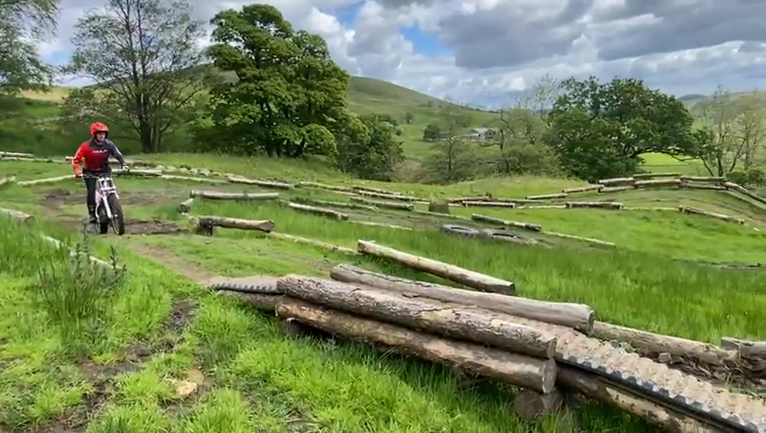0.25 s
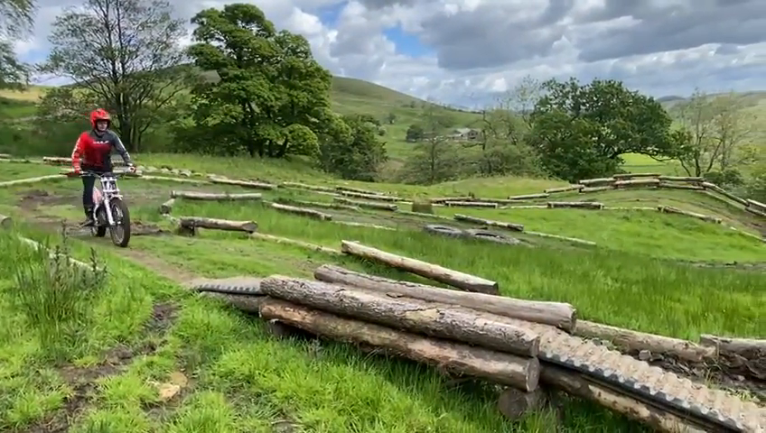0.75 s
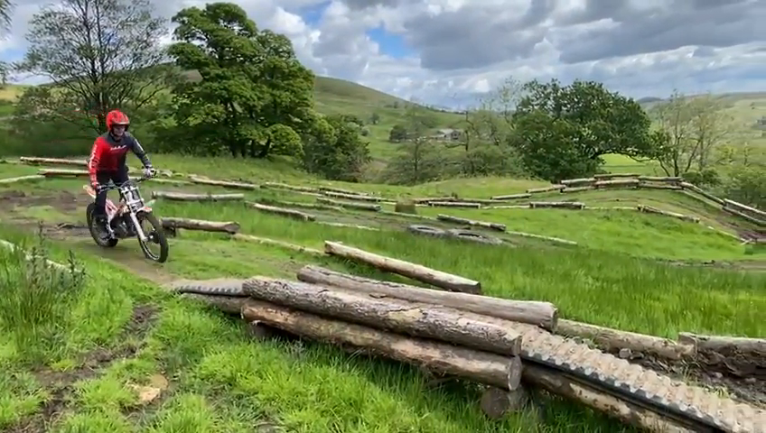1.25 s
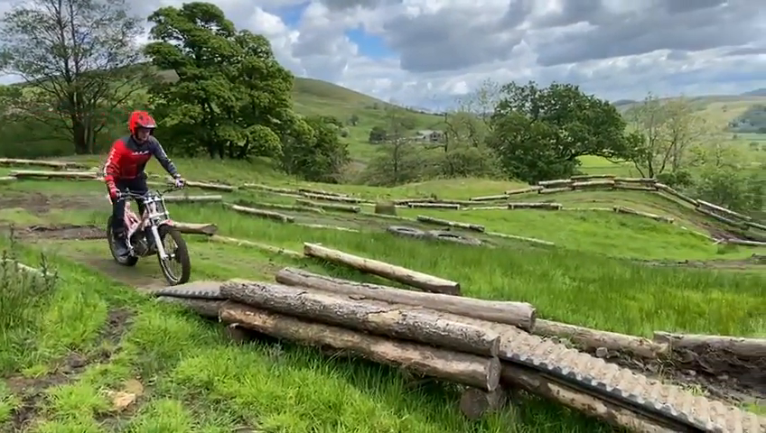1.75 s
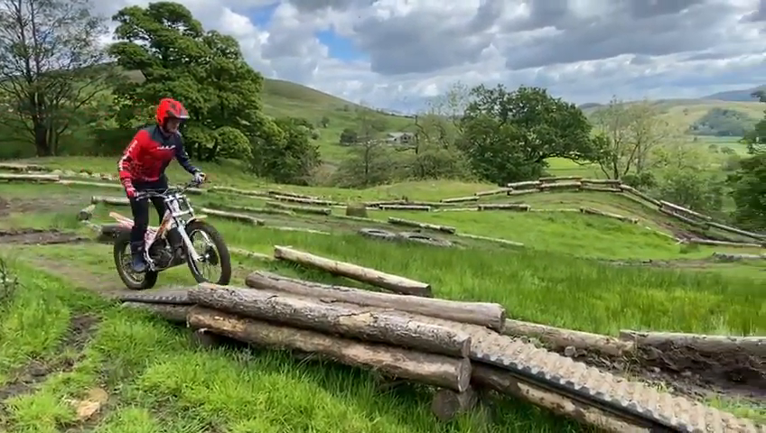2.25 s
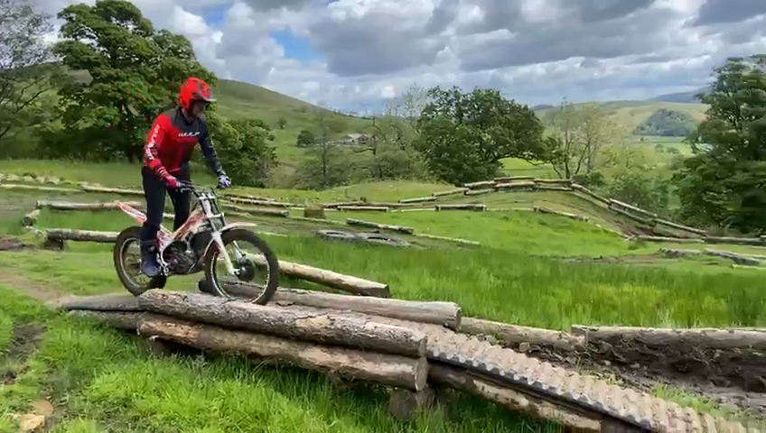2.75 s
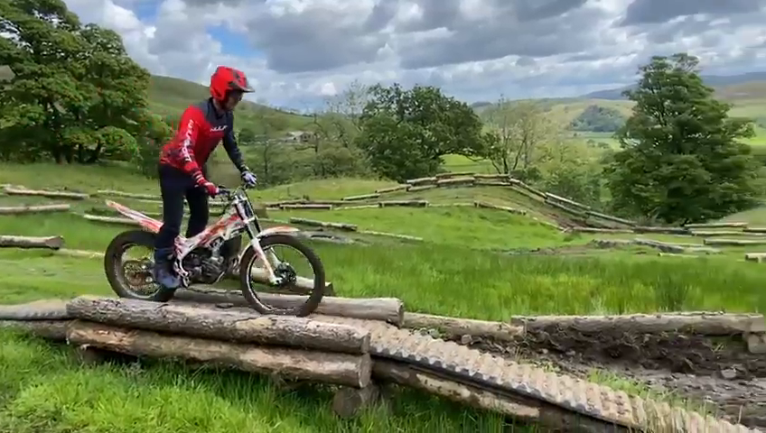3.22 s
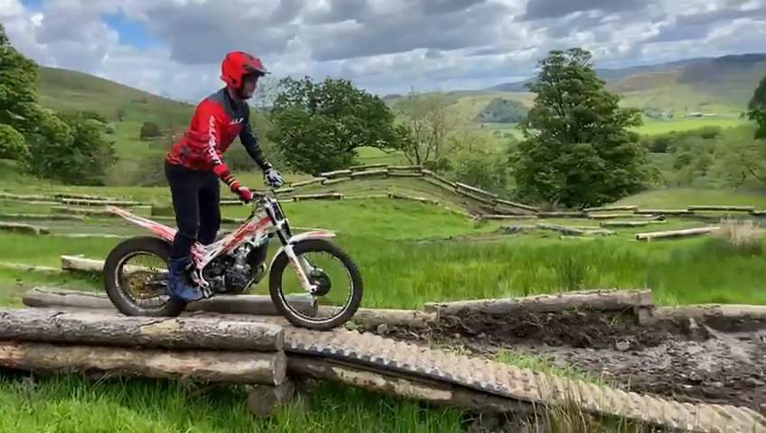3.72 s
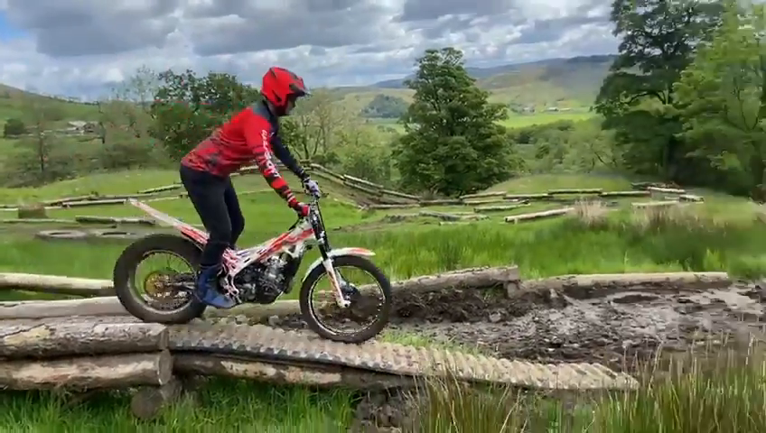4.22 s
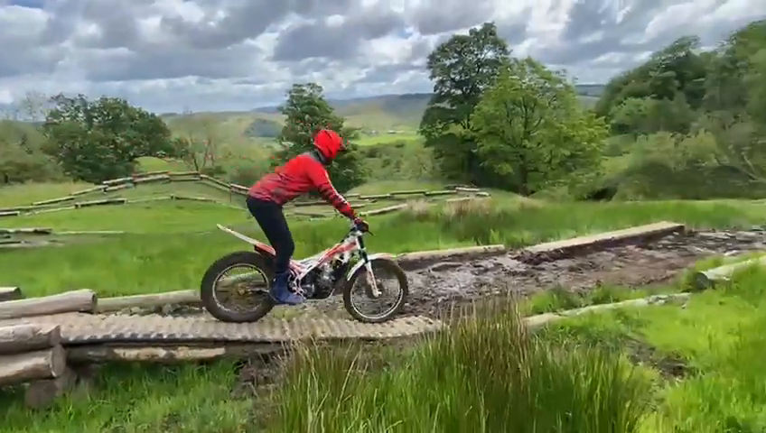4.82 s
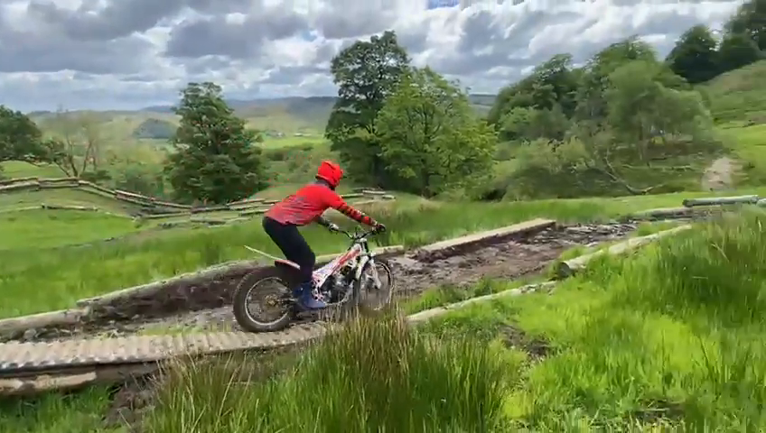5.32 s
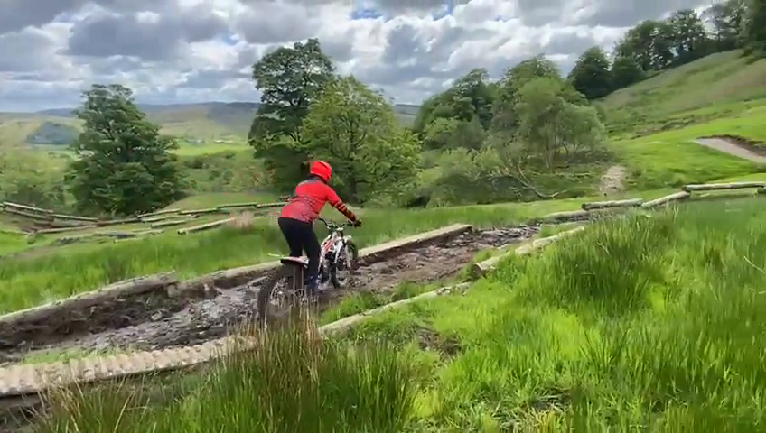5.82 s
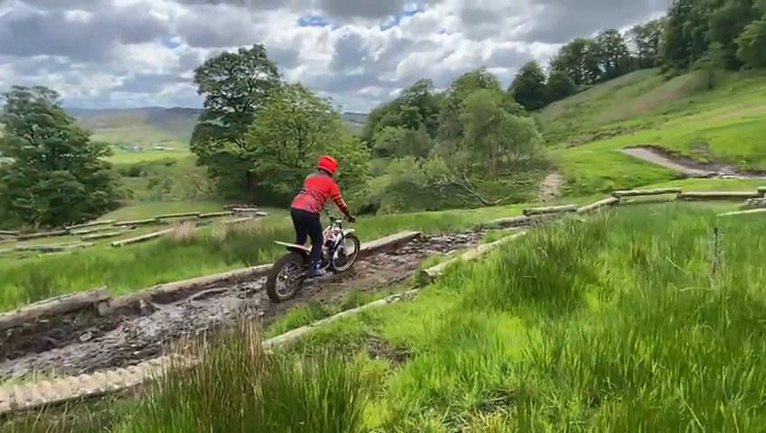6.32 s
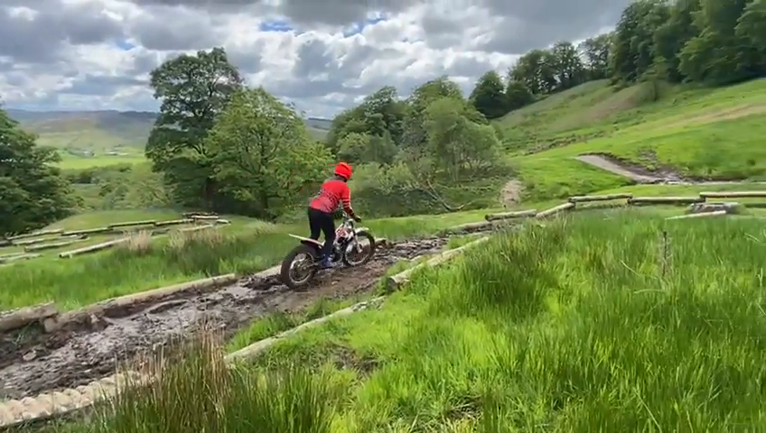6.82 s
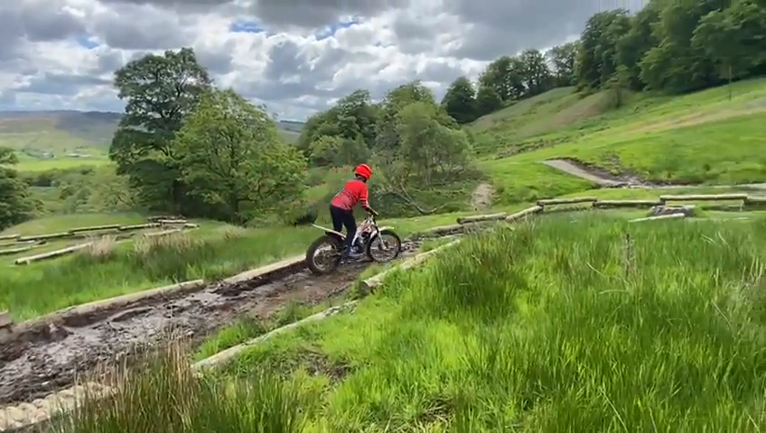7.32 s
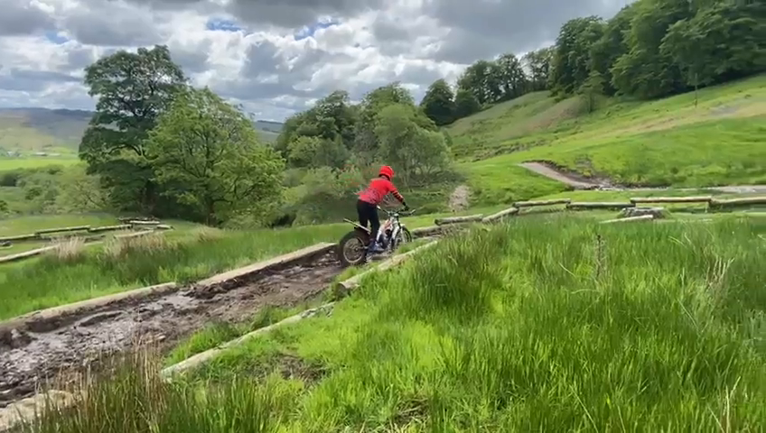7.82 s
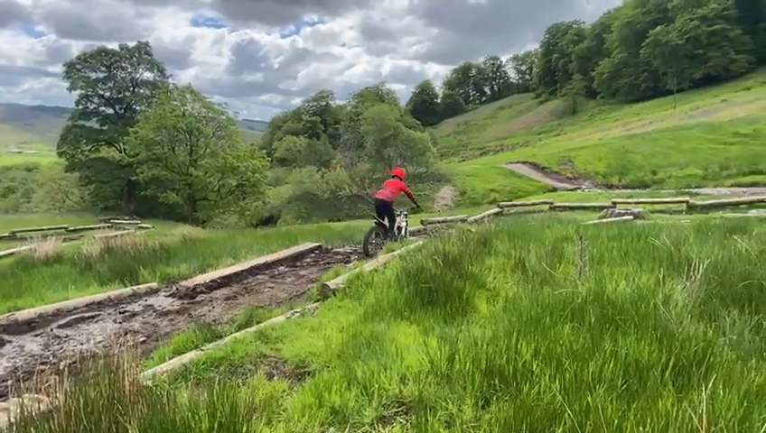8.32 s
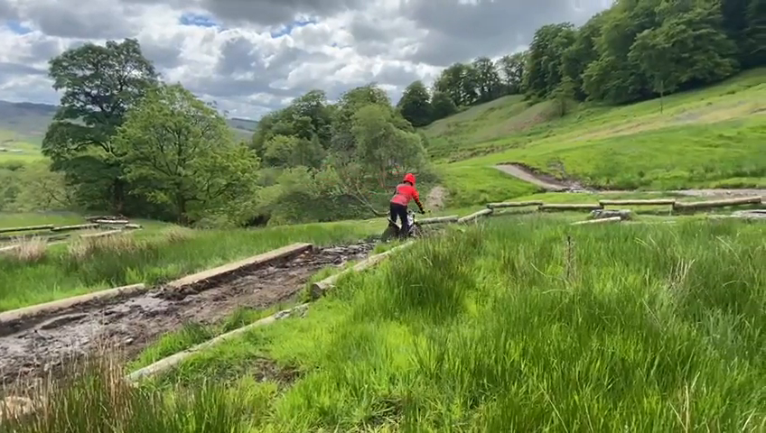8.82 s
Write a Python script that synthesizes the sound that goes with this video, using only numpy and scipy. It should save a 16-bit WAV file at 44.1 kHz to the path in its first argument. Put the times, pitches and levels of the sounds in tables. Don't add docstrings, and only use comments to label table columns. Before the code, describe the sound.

A small two-stroke motorcycle pops unevenly at low revs, whining and rattling past over logs and mud, then recedes across open grassland.

```python
import sys
import numpy as np
from scipy import signal
from scipy.fft import rfft, irfft, next_fast_len
from scipy.io import wavfile
from scipy.ndimage import uniform_filter1d

SR = 44100
rng = np.random.default_rng(int(sys.argv[2]) if len(sys.argv) > 2 else 0)


def store_wav(level_fs):
    pcm = np.round(np.clip(np.atleast_2d(level_fs), -1, 1) * 32767)
    wavfile.write(sys.argv[1], SR, pcm.T.astype(np.int16))


def invert_db(x):
    u = np.asarray(x, float) / 20
    return 10 ** u


N = 399546
TIME = np.arange(N) / SR

# t/s, lead of the left port [samples]
BEARING = [(0, 9.5), (1.4, 9.4), (1.7, 8.6), (2.7, 7.8), (3.2, 7.4), (3.5, 7.1), (4.3, 6.8), (4.42, 6),
           (5.8, 6.4), (7.3, 4.9), (8.6, 1.2), (9.06, .6)]
# t/s, charge level/dB, bite/dB (crack and spit beyond the usual)
POPS = [(0.031, -24, -22), (0.112, -25, -10), (0.217, -16, 1.5), (0.268, -19.5, -11), (0.293, -17.5, 1),
        (0.341, -18, -3), (0.364, -16.5, 0.5), (0.434, -16, 2), (0.527, -16, 4), (0.706, -16.5, -7.5),
        (0.876, -21.5, -18), (0.95, -16, 2.5), (1.06, -16.5, -1), (1.168, -17, -6), (1.28, -15, 1),
        (1.389, -15.5, -0.5), (1.6, -15.5, 2), (1.703, -14, 4), (1.833, -14.5, 4), (1.934, -16.5, 0),
        (2.04, -16.5, 3.5), (2.146, -16, 2), (2.287, -16, 1), (2.435, -13.5, 5), (2.598, -15, 4.5),
        (2.698, -25.5, -9), (2.772, -24.5, -19), (2.917, -19.5, -7), (3.036, -21, -15.5),
        (3.206, -16, 2), (3.321, -19, -9), (3.492, -16, 3.5), (3.632, -12.5, 8), (3.837, -15, 7),
        (4.014, -12, 7), (4.221, -12, 4), (4.383, -13, 5.5), (4.542, -20.5, -10), (4.602, -15.5, 2.5),
        (4.685, -17, -7), (4.853, -13, 3), (5.012, -12, 7.5), (5.162, -14.5, 6.5), (5.235, -17.5, 5),
        (5.338, -22, -9), (5.429, -22, -13), (5.564, -10.5, 4.5), (5.746, -17.5, -15), (5.83, -22.5, -15),
        (5.943, -16, -7), (6.089, -25.5, -19),
        (6.577, -15, -6), (6.645, -17.5, 2.5), (6.744, -12.5, -0.5), (6.808, -13, 0.5), (6.906, -13, -0.5),
       (6.974, -11.5, 1), (7.036, -13.5, 6.5), (7.125, -12.5, 5.5), (7.183, -14.5, 7), (7.238, -11, 3.5),
       (7.29, -13.5, 4), (7.397, -17.5, -7), (7.534, -28, -10.5), (7.669, -22, -22), (8.042, -30.5, -17.5),
       (8.131, -22, -18), (8.429, -19.5, -16), (8.727, -12.5, -5), (8.817, -13, -4), (8.901, -11.5, -5),
       (8.987, -14.5, -1.5)]
FIRINGS = POPS
# f/Hz, width/Hz, level/dB
TAILPIPE = [(343.7, 134, .1)]
# f/Hz, level/dB
GRIT = [(2000, -22), (5000, -3), (6500, 5), (9000, -17), (11000, -2), (13000, -12.5)]


def evened(x):
    return x / np.sqrt(np.mean(x ** 2) + 1e-20)


def curves(rows):
    s, *columns = np.transpose(rows)
    return [np.interp(TIME, s, c) for c in columns]


def coloured(x, points):
    hz, db = np.transpose(points)
    n = x.shape[-1]
    size = next_fast_len(n)
    bins_hz = np.fft.rfftfreq(size, 1 / SR)
    gain = invert_db(np.interp(np.log(bins_hz + 1), np.log(hz), db))
    return evened(irfft(rfft(x, size) * gain, size)[..., :n])


def resonate(x, hz, width_hz):
    r = np.exp(-np.pi * width_hz / SR)
    if np.isscalar(hz):
        pole = r * np.exp(2j * np.pi * hz / SR)
        return 2 * signal.lfilter([1 - r], [1, -pole], x + 1e-18).real
    turn = np.exp(2j * np.pi * np.cumsum(hz) / SR)
    return 2 * (turn * signal.lfilter([1 - r], [1, -r], x / turn + 1e-18)).real


def steep(x, hz, width_hz):
    return resonate(resonate(x, hz, width_hz), hz, width_hz)


def through(x, modes):
    return evened(sum((-1) ** k * invert_db(db) * steep(x, hz, w) for k, (hz, w, db) in enumerate(modes)))


def turned(modes, change_db, tail):
    return [(hz, w, db + tail * change) for (hz, w, db), change in zip(modes, change_db)]


def behind(lead):
    ahead_lead = 9.5
    return np.clip(1 - lead / ahead_lead, 0, 1)


def kicks():
    kick_hz, fade_s = 4.2, .08
    push = np.zeros(N)
    for s, db, _ in FIRINGS:
        push[round(s * SR)] = kick_hz * invert_db(.5 * (db + 13))
    saw = signal.lfilter([1], [1, -np.exp(-1 / (fade_s * SR))], push)
    saw = uniform_filter1d(saw, size=500)
    return saw - uniform_filter1d(saw, size=12000)


def crank():
    # t/s, turns per second [Hz]
    speed_points = [(0, 44.2), (.12, 43), (.2, 39.6), (.44, 45.2), (.61, 38.4), (1, 35.6), (1.7, 38.9),
                    (2.1, 37.5), (2.65, 28), (4.2, 28.6), (5.2, 40.3), (5.65, 38.4), (5.97, 34.7),
                    (6.55, 31), (7.3, 36.5), (7.8, 30.4), (8.4, 28.8), (9.06, 36.3)]
    port_lag = 0.2605
    speed = curves(speed_points)[0] + kicks()
    lit_s = np.array([s for s, db, _ in FIRINGS if db > -20.7])
    turns = np.interp(lit_s, TIME, np.cumsum(speed) / SR)
    whole = np.cumsum(np.round(np.diff(turns, prepend=0)))
    nudge = uniform_filter1d(np.interp(TIME, lit_s, whole - turns), size=1500)
    speed = speed + SR * np.gradient(nudge)
    return speed, np.cumsum(speed) / SR + whole[0] - turns[0] + 1 - port_lag


def per_turn(turns, spread_db):
    gains = invert_db(spread_db * np.clip(rng.standard_normal(1000), -2, 2))
    return gains[turns.astype(int) % 1000]


def pumping(turns, tail, rough):
    out = np.zeros(N)
    for shift, size in ((0, 0.54), (.45, -0.41 + 0.51 * tail)):
        pulse = np.diff(np.floor(turns + shift), prepend=0)
        out += size * pulse * per_turn(turns + shift, spread_db=2.2)
    return evened(out) + rough * rng.standard_normal(N)


def silencer(pulses, tail):
    # f/Hz, width/Hz, level/dB, delay/s, change fully behind/dB
    chambers = [(65.5, 55, 2, 0.0161, -9.5), (113.6, 99, -2, .011, 7.5), (186.2, 54.7, 4, 0.005015, -9),
                (240.8, 56, -1, 0.0033, 1), (301.3, 48, 0, 0.0011, 8)]
    out = np.zeros(N)
    for k, (hz, w, db, s, turned_db) in enumerate(chambers):
        ring = np.roll(steep(pulses, hz, w), round(s * SR))
        out = out + (-1) ** k * invert_db(db + turned_db * tail) * ring
    return evened(out)


def throb(turns, at, sharp, base, spread_db):
    swell = np.exp(sharp * (-np.cos(2 * np.pi * (turns + at)) - 1))
    return base + swell * per_turn(turns + at, spread_db)


def rattle(turns, tail):
    # f/Hz, width/Hz, level/dB
    case_modes = [(519, 73, -6), (734, 390, -6), (1016, 242, 5), (1200, 720, -7), (1683, 250, -4.5),
                  (2736, 210, -14.5), (3180, 87, -4)]
    case_change_db = (1, 3.5, -6.5, -2.5, 2.5, -5, -1.5)
    shake = throb(turns, .9, sharp=2.2, base=.5, spread_db=3.) * rng.standard_normal(N)
    return through(shake, turned(case_modes, case_change_db, tail))


def hiss(turns):
    # f/Hz, level/dB
    air_points = [(1500, 4.5), (2200, 6), (3500, 6), (5000, -1), (6500, -2.5), (8000, -8.5), (10500, -9),
                  (13000, -27)]
    ticks = invert_db(1.8 * np.minimum(rng.exponential(1, N), 5)) * (rng.random(N) < 60 / SR)
    grit = signal.oaconvolve(ticks, np.hanning(90))[:N] * rng.standard_normal(N)
    air = throb(turns, .7, sharp=0.65, base=1.0, spread_db=3.0) * rng.standard_normal(N)
    return coloured(air, air_points) + invert_db(-14.5) * coloured(grit, GRIT)


def whine(speed, order, width_hz, fuzz):
    line = np.sqrt(2) * np.sin(2 * np.pi * np.cumsum(order * speed) / SR)
    haze = evened(resonate(rng.standard_normal(N), order * speed, width_hz))
    return evened(line + fuzz * haze)


def drumming(speed):
    start_s, rise_s, fade_s, level_db, always = 5.34, 0.078, 0.78, -30.5, 0.38
    late = TIME - start_s
    swell = np.clip(late / rise_s + 1, 0, 1) * np.exp(-(np.maximum(late, 0) / fade_s) ** 3)
    return invert_db(level_db) * np.maximum(swell, always) * whine(speed, order=7, width_hz=15, fuzz=.5)


def wind():
    # f/Hz, level/dB
    wind_points = [(15, -29), (30, -30), (55, 23.5), (110, 1), (250, -4), (500, -5.5), (2000, -33),
                   (12000, -56)]
    lumps = uniform_filter1d(rng.standard_normal(N), size=6000)
    lumps = evened(uniform_filter1d(lumps, size=6000))
    gusts = rng.standard_normal((2, N)) + .8 * rng.standard_normal(N)
    return invert_db([[-39.5], [-42]]) * coloured(gusts, wind_points) * invert_db(3.5 * lumps)


def firing(thump_db, ring_db, bite_db, spit_db, stretch, tail, noise):
    # f/Hz, width/Hz, level/dB
    crack_modes = [(629, 250, -6), (941, 115, 4), (1340, 550, -7), (1670, 120, -9)]
    crack_change_db = (23.5, -17, -37, -7)
    # f/Hz, level/dB
    spit_points = [(1200, 12.5), (2000, 8.5), (3500, 2.5), (6000, -5), (9000, -9.5), (13000, -15.5)]
    t = np.arange(len(noise[0])) / SR - .012

    late = np.maximum(t, 0) / stretch - .0062
    cycles = 100 * late + 0.24 * (1 - np.exp(-late / 0.00215))
    steepness = 2.2 + 0.26 * max(-bite_db, 0)
    swell = np.clip(t / stretch / .0065, 0, 1) ** steepness
    swell = swell * np.exp(-np.maximum(late - .008, 0) / .007)
    chamber = 0.42 + 0.24 * max(1 - 4 * tail, 0)
    hump = np.cos(2 * np.pi * cycles) - chamber * np.cos(2 * np.pi * 260 * (late - .0024))
    thump = invert_db(thump_db - tail) * swell * hump

    phase = -2.78 + 0.55 * noise[0, 0]
    ring = np.exp(-((t - .007) / 0.0033) ** 2) * np.cos(2 * np.pi * TAILPIPE[0][0] * late + phase)

    blast = np.exp(-((t - .004) / 0.0012) ** 2) + 0.0715 * (t > 0) * np.exp(-abs(t) / 0.034)
    snap = 1.14 * np.diff(np.exp(-((t - .003) / 0.00021) ** 2), prepend=0) * 10
    crack = through(blast * noise[0] + snap, turned(crack_modes, crack_change_db, tail))
    crack = invert_db(thump_db + bite_db - 8) * crack * np.sqrt(np.mean(blast ** 2))

    jet = np.exp(-np.maximum(t - .003, 0) / .004) * np.exp(np.minimum(t - .003, 0) / .002)
    jet = jet + .12 * np.exp(-(t / .011) ** 2)
    return thump + invert_db(ring_db) * ring + crack + invert_db(spit_db) * jet * coloured(noise[1], spit_points)


def exhaust(height, tail):
    booms_db = [-2, -4, 11, 4, 5, 8, 8, 7.5, 2, 19, 6, 2, -2, 2, 11, -2, 2, 7, 11, 3.1, .1, .1, -1, 15, 2,
                -3, -2, -3, -5, -7, -5, -5.74, -2.5, -1, -2, -1, -1, -3, -4, -1.5, -1, 2.5, -1, -0.5, 2.52,
                -6, 0, -6, -2, -4, -2, 4, -5.5, 8, -6, .1, 1, 1, 1, 10, 4, 8, .1, 7.13, -6, 5, -1, -2.94,
                18, 12, 15, 14]
    out = np.zeros(N + SR)
    noise = rng.standard_normal((len(FIRINGS), 2, 3600))
    luck = rng.standard_normal((len(FIRINGS), 2))
    for (s, db, bite_db), own, (a, b), boom_db in zip(FIRINGS, noise, luck, booms_db):
        start = round(s * SR)
        ring_db = db - 30 + 36 * height[start] - a + boom_db + min(bite_db, 0)
        spit_db = db + bite_db - 16.5 + 10 * tail[start] + 1.5 * b
        stretch = 0.927 + 0.04 * (db + 15.5)
        pop = firing(db, ring_db, bite_db, spit_db, stretch, tail[start], own)
        out[start:start + len(pop)] += pop
    return out[round(.012 * SR):][:N]


def scatter(x, t60):
    # f/Hz, level/dB
    echo_points = [(150, -60), (500, -6), (1500, -7), (3000, -4), (6000, 1), (9500, -0.5), (11500, -15)]
    t = np.arange(SR // 10) / SR
    shape = (2, 2, len(t))
    taps = rng.choice([-1., 1.], shape) * (rng.random(shape) < .05)
    taps = taps * invert_db(-60 * t / t60) * (t > .002)
    taps = coloured(taps, echo_points) / np.sqrt(2 * len(t))
    moving = np.cos(np.pi * (TIME / .9 + np.arange(2)[:, None, None] / 2))
    return signal.oaconvolve(x * moving, taps, axes=2)[..., :N].sum(0)


def clinks():
    # t/s, peak level/dB, ring f/Hz
    strikes = [(0.4905, -32.5, 4180), (1.267, -35, 5730), (1.343, -37, 5400), (2.045, -38, 6100),
               (2.136, -41, 6100), (2.7174, -30, 5830), (3.186, -32, 4200), (3.8781, -29, 4270),
               (3.9706, -35, 7080), (4.121, -41, 10800), (4.171, -39, 6140), (4.3868, -20, 5550),
               (4.4757, -41, 6400), (4.739, -32, 6650), (4.8532, -23, 5900), (5.0158, -17.5, 3800),
               (5.234, -26, 11000), (5.3894, -21.5, 6400), (5.489, -23, 4310), (5.8256, -30.5, 6150),
               (5.886, -30, 6340), (6.0873, -36, 6300), (6.166, -35, 6700), (6.2156, -28, 6650),
               (6.826, -31.5, 6470), (6.854, -40, 6680), (7.114, -34, 6670), (7.456, -35, 6540),
               (7.502, -38, 6340), (8.299, -34, 4230)]
    out = np.zeros(N + SR)
    noise = rng.standard_normal((len(strikes), 1024))
    t = np.arange(1024) / SR
    envelope = (1 - np.exp(-t / 0.00059)) * np.exp(-t / 0.0019)
    for (s, db, hz), own in zip(strikes, noise):
        scrape = envelope * (coloured(own, GRIT) + 1.44 * evened(resonate(own, hz, 490)))
        out[round(s * SR):][:len(t)] += invert_db(db - 4.5) * scrape
    return out[:N]


def octave_line():
    # t/s, f/Hz, level/dB
    line_points = [(4.6, 1640, -58), (4.8, 1670, -44.5), (5.35, 1775, -60), (5.8, 1635, -46),
                   (6.05, 1560, -52), (6.3, 1505, -52), (6.5, 1395, -43.5), (6.75, 1500, -54),
                   (7.25, 1640, -52), (7.45, 1510, -48), (7.9, 1340, -56)]
    hz, db = curves(line_points)
    heard = 1. * (TIME > line_points[0][0]) * (TIME < line_points[-1][0])
    heard = uniform_filter1d(heard, size=9000)
    return heard * invert_db(db + 1.5) * whine(hz, order=1, width_hz=45, fuzz=1.6)


def ground(hz, height):
    low_hz, raised_hz, depth_db, width_octaves = 525, 213, -8.5, .3
    dip_hz = low_hz + (raised_hz - low_hz) * height
    octaves = np.log2((hz[:, None] + 1) / dip_hz)
    return invert_db(depth_db * np.exp(-(octaves / width_octaves) ** 2))


def ports(x, height):
    housing_hz = (0, 1000, 1600, 2000, 2600, 3300, 3800, 4300, 4700, 5200, 5700, 6200, 6700, 7400, 8000,
                   8500, 9500, 10200, 10700)
    # plain lead [samples], then lead at each inner housing_hz [cycles]
    housing = [(1, .06, .01, .09, .17, .22, .2, .33, .33, .05, 0, .92, 1, 1.2, 1.48, 1.78, 1.52, 1.05),
               (3.5, .06, .02, .2, .23, .27, .38, .43, .48, .36, .32, .8, .93, 1.33, 1.55, 1.62, 1.3, 1.12),
               (5, .05, .04, .27, .3, .35, .46, .51, .5, .49, .49, .82, .96, 1.33, 1.6, 1.72, 1.5, 1.2),
               (6.2, .12, .1, .35, .4, .48, .56, .65, .55, .5, .52, .8, 1, 1.3, 1.66, 1.9, 1.6, 1.1),
               (7, .11, .1, .4, .4, .46, .55, .72, .57, .52, .52, .75, .98, .97, 1.22, 1.5, 1.5, 1.15),
               (7.7, .15, .18, .46, .5, .53, .72, .98, .98, .95, .77, .98, 1, 1.25, 1.5, 1.5, 1.5, 1.3),
               (8.5, .17, .22, .49, .52, .66, .85, 1, 1, 1, .9, 1, 1.1, 1.5, 1.52, 1.5, 1.5, 1.3),
               (9.5, .19, .27, .5, .6, .81, .93, 1, 1.03, 1.08, 1, 1, 1.2, 1.65, 1.72, 1.52, 1.5, 1.08)]
    # f/Hz, left minus right/dB
    shade = [(500, .3), (1200, 1.4), (1800, -4.5), (2500, -1), (3900, -2.5), (5200, 1), (7500, -3),
             (10000, .5)]
    shimmer = .08
    hz, t, z = signal.stft(x, SR, nperseg=1024, noverlap=768)
    z = z * ground(hz, np.interp(t, TIME, height))
    lead, rows = np.interp(t, *np.transpose(BEARING)), np.array(housing)
    shapes = np.array([np.interp(hz, housing_hz, [0, *row[1:], np.round(row[-1])]) for row in rows])
    share = np.array([np.interp(lead, rows[:, 0], one) for one in np.eye(len(rows))])
    wander = uniform_filter1d(rng.standard_normal(z.shape), size=6, axis=0)
    wander = evened(uniform_filter1d(wander, size=4, axis=1))
    cycles = shapes.T @ share + shimmer * wander * np.minimum(0.31 + hz / 4000, .8)[:, None]
    lean_db = .1 - 2.2 * behind(lead) ** 2
    level_db = lean_db + np.interp(hz, *np.transpose(shade))[:, None]
    half = invert_db(level_db / 2) * np.exp(1j * np.pi * cycles)
    return signal.istft(np.array([z * half, z / half]), SR, nperseg=1024, noverlap=768)[1][:, :N]


def scene():
    # t/s, nearness/dB, height off the ground [0-1], gear load/dB
    path = [(0, -14, 0.2, 9), (.2, -12, 0.34, 8.5), (.45, -10.5, 0.42, 12), (.7, -10.5, 0.29, 7),
            (1.0, -10.5, 0.18, 6), (1.2, -8.5, 0.39, 1), (1.9, -5.5, 0.49, 2.5), (2.6, -5, 0.31, 0.5),
            (3.3, -3.5, 0.86, -2.5), (4.4, 0.5, 1, -10), (5.17, -1, 0.86, 3), (5.42, -1.5, 0.66, 6),
            (5.65, -2, 0.6, -6), (6.4, -7, 0.54, 0.5), (7.2, -5, 0.23, 1.5), (7.9, -4.5, 0.3, -9),
            (8.6, -11, 0.13, -3.5), (9.06, -11, 0.14, -1.5)]
    # level/dB, share of nearness, change fully behind/dB, share of load, change raised/dB
    layers = ((-27.5, 0.32, -1.5, 0.2, 1.5),
              (-58.5, 0, 1.5, 0.88, 25.5),
              (-34.5, .5, -11.5, -0.1245, 1.5),
              (-34, 1.24, -0.24, 0.15, 0.5),
              (-44, 0.66, -6.5, 1.4, 6.5),
              (-40, 1.4, 5.5, 0.84, -4.5))
    gear_teeth = 22
    speed, turns = crank()
    tail = behind(curves(BEARING)[0])
    near_db, height, load_db = curves(path)
    pump, pipe, cases, air, mesh, octave = (
        invert_db(db + a * near_db + b * tail + c * load_db + d * height) for db, a, b, c, d in layers)
    pulses = -pumping(turns, tail, rough=.3)
    bike = pump * silencer(pulses, tail) + pipe * through(pulses, TAILPIPE)
    bike += cases * rattle(turns, tail) + air * hiss(turns)
    bike += mesh * whine(speed, order=gear_teeth, width_hz=40, fuzz=.25 + 3 * tail)
    bike += octave * whine(speed, order=2 * gear_teeth, width_hz=120, fuzz=2.2)
    bike += drumming(speed) + exhaust(height, tail) + clinks() + octave_line()
    return ports(bike, height) + invert_db(-7.5) * scatter(bike, t60=0.082) + wind()


def joint_stereo(pair):
    band_bins = [*range(0, 96, 8),
                 96, 108, 120, 132, 144, 160, 176, 196, 216, 240, 264, 292, *range(320, 1024, 32)]
    # f/Hz, gap that drops the weaker/dB
    joint_gap = [(200, 24), (1000, 17), (2000, 10.5), (3300, 10.5), (4300, 9), (5000, 6.3), (6500, 5),
                 (8000, 4.8), (9500, 4), (11000, 3)]
    sum_diff = np.array([pair[0] + pair[1], pair[0] - pair[1]]) / 2
    hz, _, z = signal.stft(sum_diff, SR, nperseg=2048, noverlap=1024)
    edges = np.array(band_bins)
    power_db = 10 * np.log10(np.add.reduceat(abs(z) ** 2, edges, axis=1) + 1e-20)
    gap_hz, gap_db = np.transpose(joint_gap)
    gap_db = np.interp(np.log(hz[edges] + 170), np.log(gap_hz), gap_db)[:, None]
    keep = np.repeat(power_db > power_db[::-1] - gap_db, np.diff([*edges, len(hz)]), axis=1)
    mid, side = signal.istft(z * keep, SR, nperseg=2048, noverlap=1024)[1][:, :N]
    return np.array([mid + side, mid - side])


def low_pass(x):
    return signal.sosfilt(signal.butter(12, 12720, fs=SR, output="sos"), x)


def record(dry):
    low_cut = signal.butter(2, 40, "high", fs=SR, output="sos")
    band_limit = signal.firwin(401, 11820, fs=SR)[None]
    cut = signal.sosfilt(low_cut, dry)
    cut = signal.oaconvolve(cut, band_limit, "same", axes=1)
    return low_pass(joint_stereo(cut))


dry = scene()
out = record(dry)
store_wav(out)
```